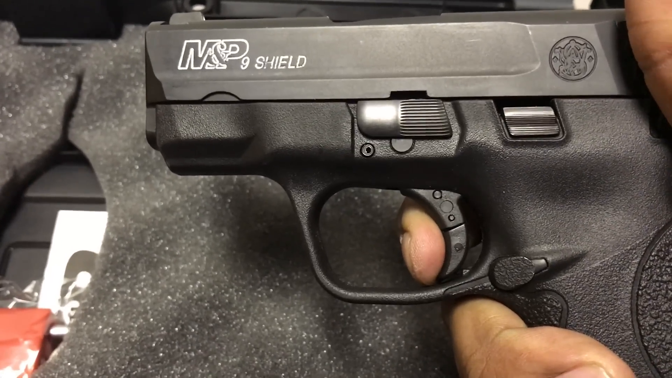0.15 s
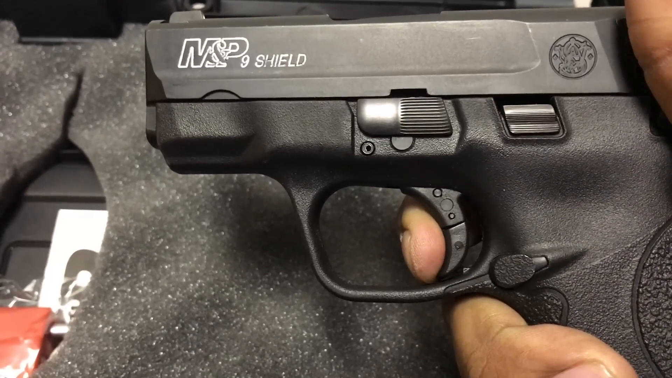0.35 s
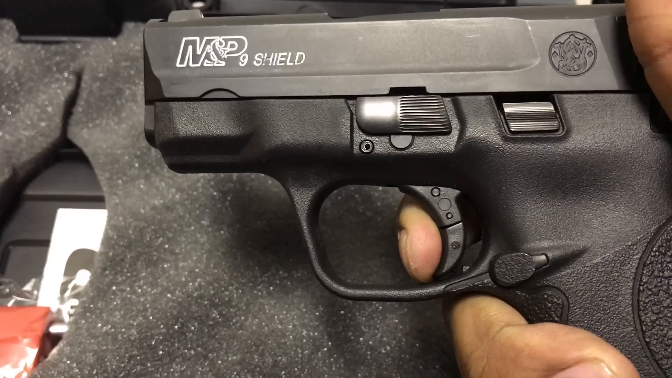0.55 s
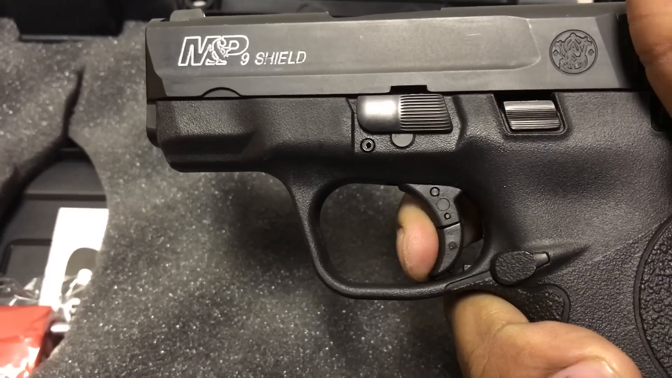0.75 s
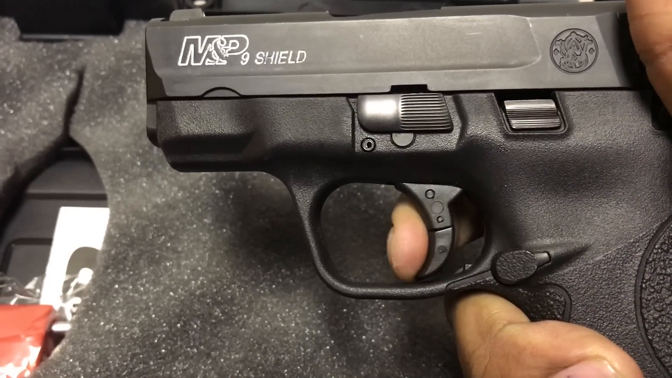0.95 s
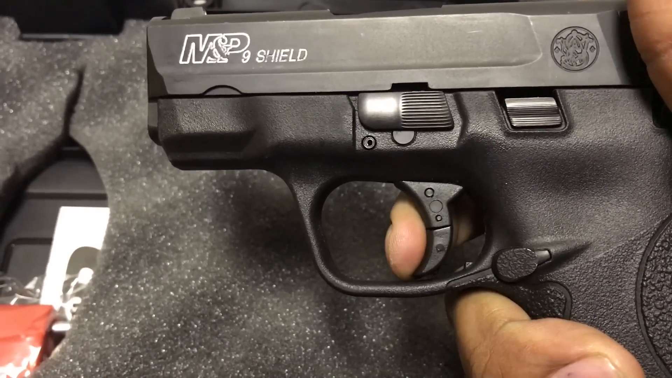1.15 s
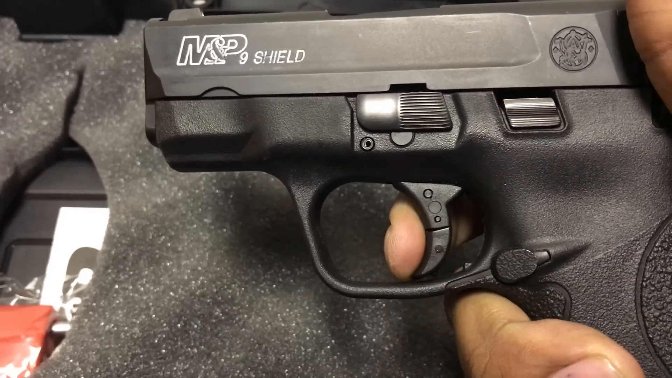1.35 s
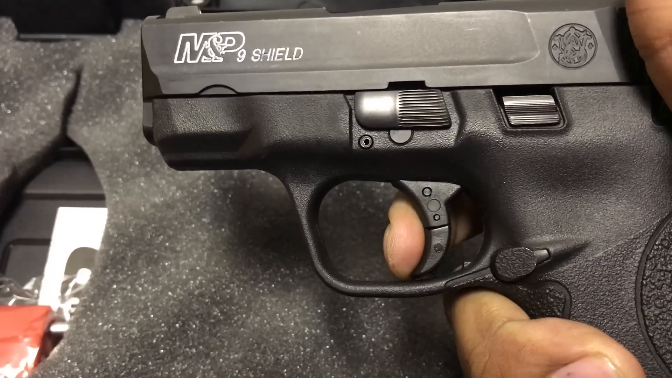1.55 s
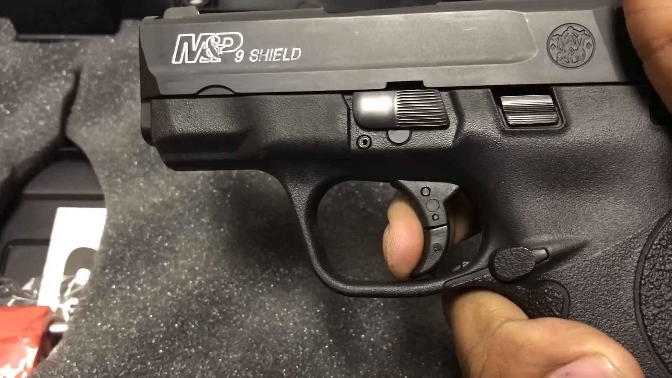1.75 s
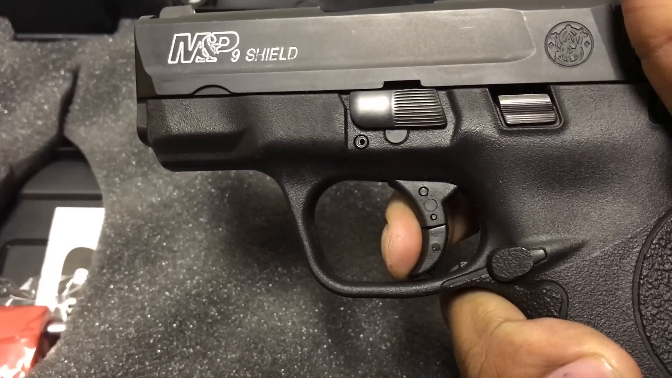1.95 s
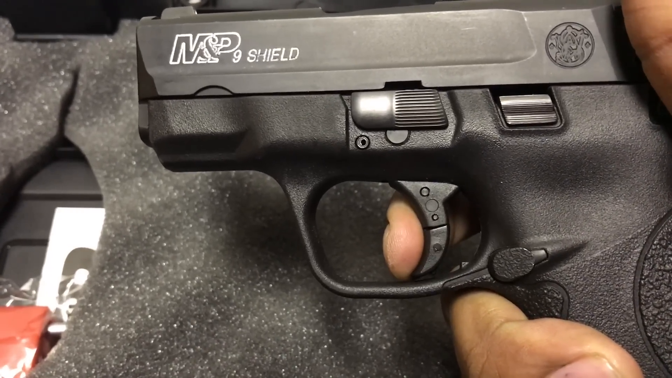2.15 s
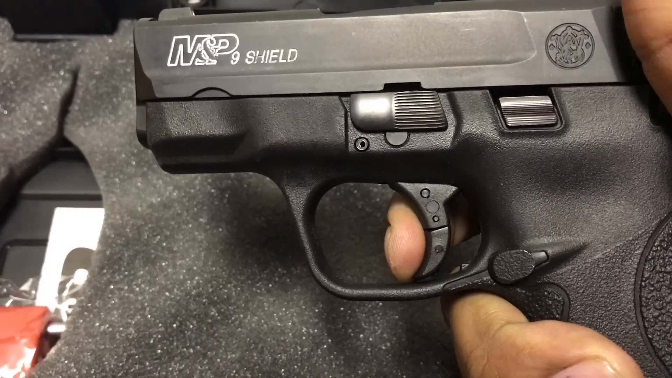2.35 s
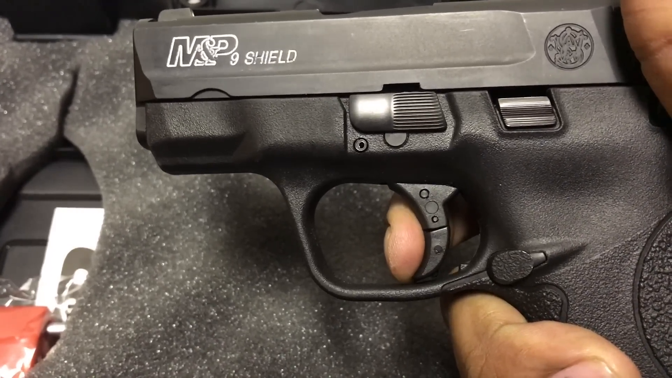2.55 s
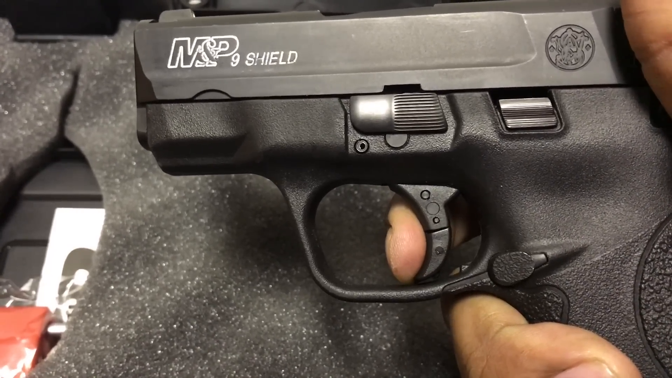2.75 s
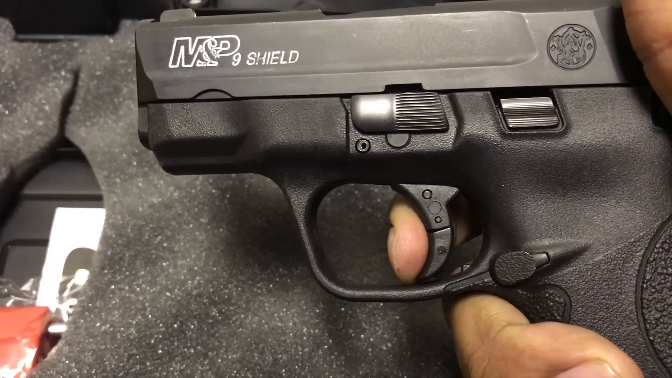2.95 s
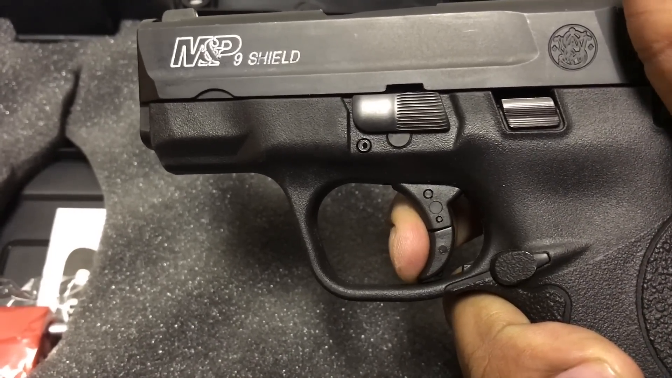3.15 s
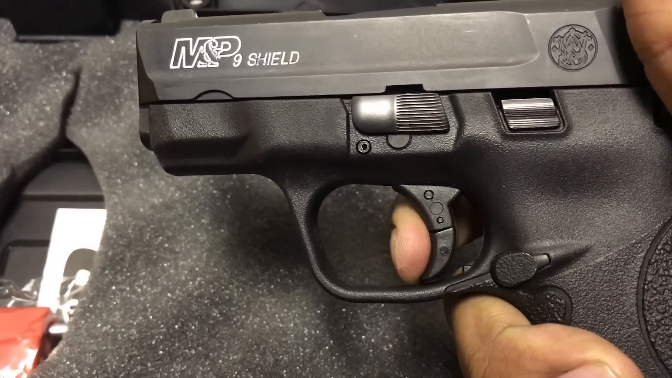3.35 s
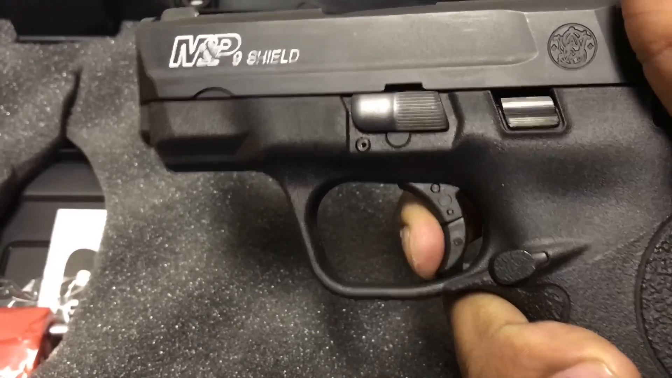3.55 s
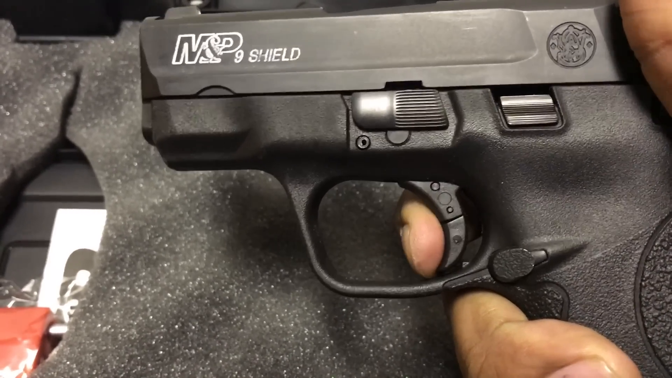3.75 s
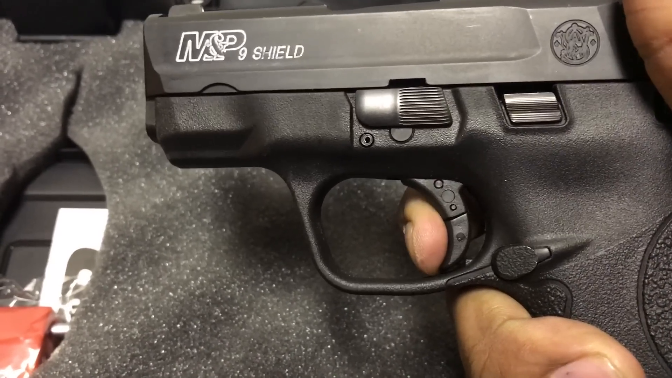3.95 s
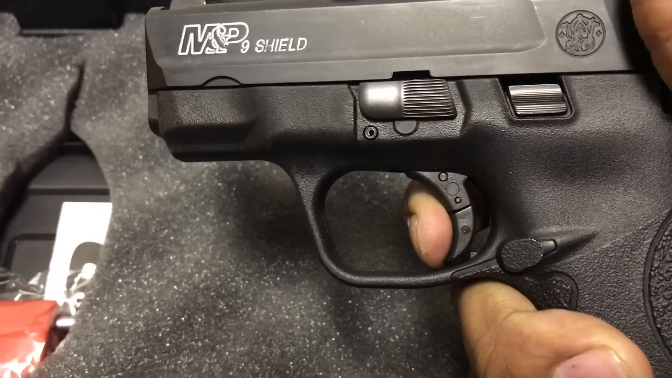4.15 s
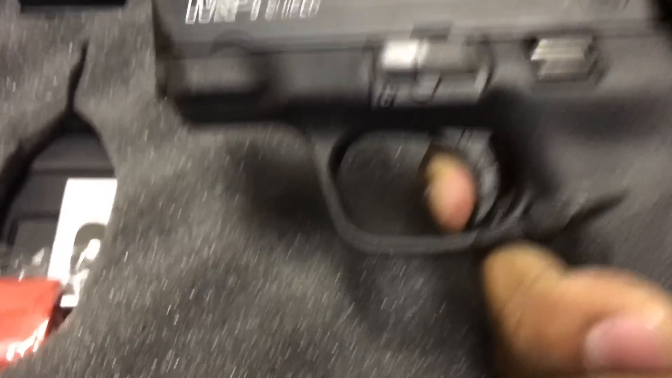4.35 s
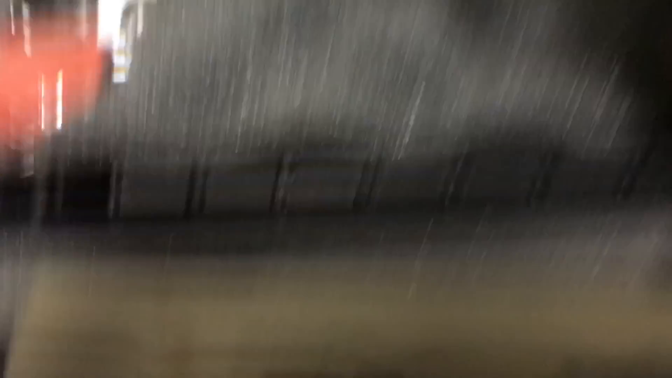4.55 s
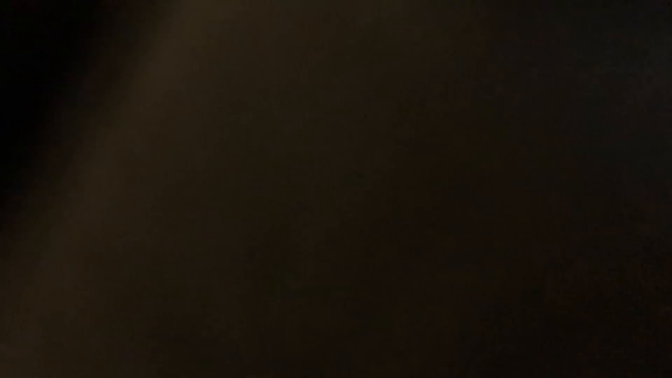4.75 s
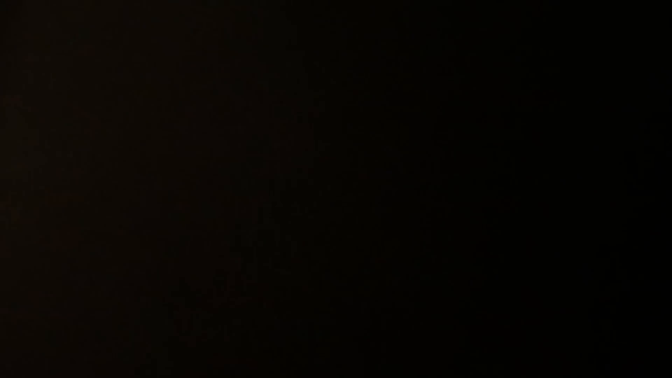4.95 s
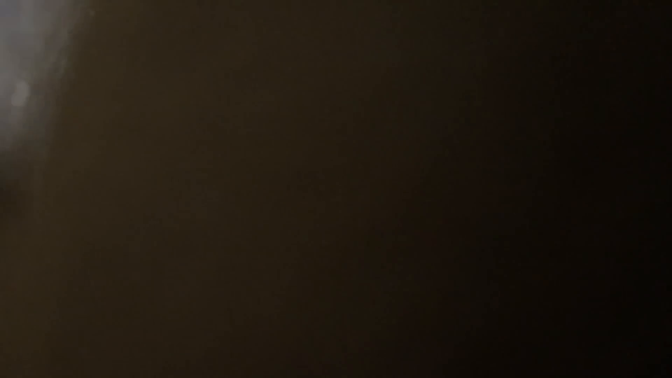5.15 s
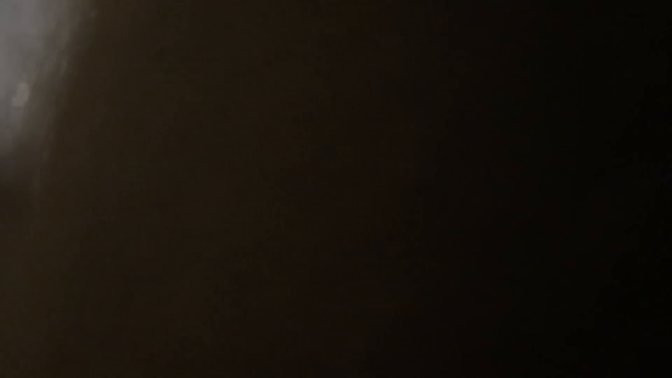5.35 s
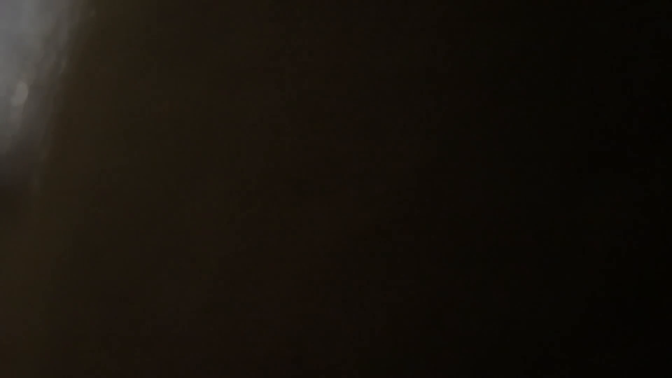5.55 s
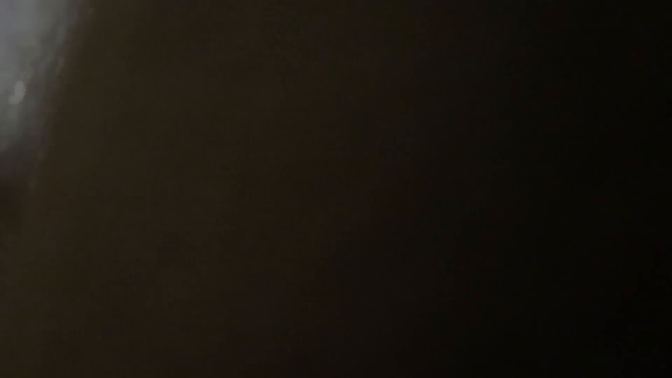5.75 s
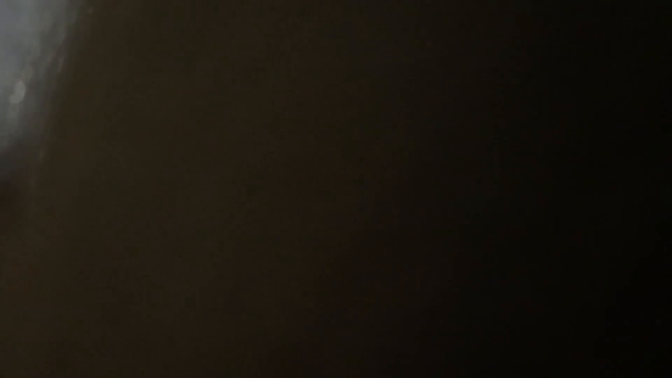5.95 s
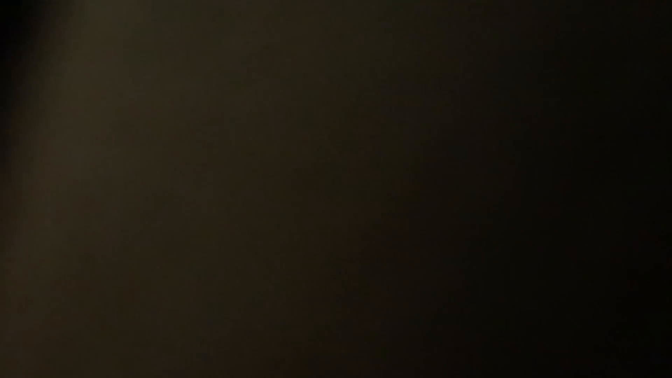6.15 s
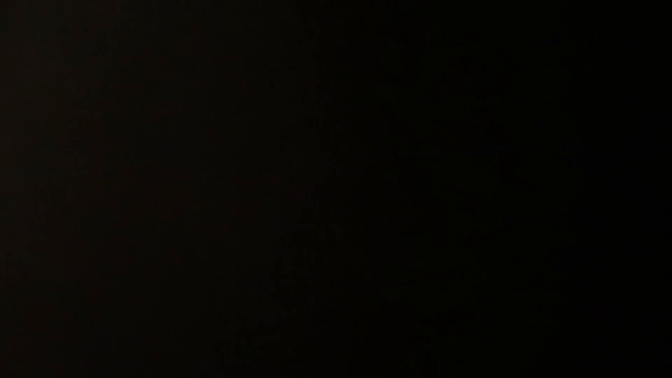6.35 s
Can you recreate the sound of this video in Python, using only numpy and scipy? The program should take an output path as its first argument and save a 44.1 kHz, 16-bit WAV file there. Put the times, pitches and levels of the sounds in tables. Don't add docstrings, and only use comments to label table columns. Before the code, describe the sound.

Dry trigger click over faint hum, a sharp metallic reset, then bumping, scraping phone handling and a loud two-stroke rack of a pistol slide.

```python
import sys
import numpy as np
from scipy import signal
from scipy.fft import rfft, irfft, next_fast_len
from scipy.io import wavfile
from scipy.ndimage import uniform_filter1d, map_coordinates

SR = 44100
rng = np.random.default_rng(int(sys.argv[2]) if len(sys.argv) > 2 else 0)


def dump(signal):
    limited = np.clip(np.atleast_2d(signal).T, -1, 1)
    pcm = np.round(limited * 32767).astype(np.int16)
    wavfile.write(sys.argv[1], SR, pcm)


def convert_level_to_amplitude(level_db):
    exponent = np.asarray(level_db, float) / 20
    return 10 ** exponent


N = 281996
T = np.arange(N) / SR

# [f/Hz, density/dB]
AIR = [(15, -30.5), (30, -7.5), (52, 1.5), (90, -6.5), (220, -12.5), (485, -20.5), (1500, -28.5),
       (16000, -37.5)]
AIR_DB = -72
# [f/Hz, rms level/dB]
HUM = [(119.95, -59), (239.95, -75)]
# [from t/s, to t/s, f/Hz]
WHINE = [
    (0, .75, 954.5),
    (.8, 1.19, 955.2),
    (1.62, 2.0, 954.1),
    (2.27, 2.93, 965.2),
    (2.95, 3.3, 964.2),
    (3.42, 3.63, 958.2),
    (4.1, 4.8, 956.8),
]
# [f/Hz, rms level/dB]
COMB = [(6500, -102), (8600, -89.5), (10500, -94.5), (12500, -86.5), (15500, -93.5)]
# [from t/s, to t/s, f/Hz, level/dB]
LENS_STEPS = [
    (2.148, 2.226, 11130, -80),
    (2.143, 2.17, 11600, -91),
    (3.338, 3.357, 11010, -78.5),
]
# [t/s, change/dB]
DUCKS = [
    (3.65, -12),
    (5.12, -5),
    (6.05, 0.5),
]
DUCK_IN_S, DUCK_HOLD_S, DUCK_OUT_S = 0.16, 0.042, 0.16
# [from t/s, to t/s, hiss level/dB]
OPEN = [
    (1.195, 1.61, -62),
    (3.643, 4.097, -64.5),
    (4.82, 5.519, -62),
    (5.65, 6.399, -62),
]
# [f/Hz, density/dB]
OPEN_HISS = [(120, -34.5), (200, -6.5), (236, -5.5), (851, -12), (10500, -19.5), (13100, -20), (16000, -22)]
# [f/Hz, t60/s]
ROOM_T60 = [(300, .15), (1500, .27), (4000, .25), (12000, .21)]
# [f/Hz, level/dB]
SPLASH = [(500, -40), (1500, -3), (4500, 0), (16000, -16)]

# [t/s, peak level/dB, knock/dB, bright edge/dB]
LAYING = [(4.8137, -43.5, -10.5, 2), (4.8255, -51, -7, 0), (4.8351, -29.5, -2, -3), (4.837, -10, -4.5, 7.5),
          (4.8402, -26, 7.5, -1.5), (4.844, -17, -4.5, 7), (4.8604, -51, -11, 0), (4.8652, -43, 4, -16),
          (4.886, -19, 1, -19), (5.0365, -43, -8.5, -16), (5.052, -23, -15, -17), (5.0569, -34, -14, -15.5),
          (5.082, -35, 5, -10), (5.0898, -41, 9, -11.5), (5.0985, -35, 2.5, -11), (5.1077, -12.5, 8, -19),
          (5.1094, -1, -12.5, -5.5), (5.1208, -32, 4, -14), (5.1302, -39, 8.5, -22), (5.133, -34, 6, -14.5),
          (5.141, -42, 4, -12), (6.345, -40, -2, -13), (6.3472, -40.5, 0, -13.5),
          (6.3545, -33.5, -17.5, -10), (6.373, -36, -5.5, -17.5), (6.38, -38.5, -5, -8),
          (6.3879, -31.5, -15, -17)]
# [f/Hz, width/Hz, level/dB]
LAYING_BODY = [(1110, 880, -2), (1730, 1040, -8), (3320, 1000, -1.5), (4380, 910, 3), (6770, 590, 3),
               (8000, 1700, 0), (11600, 1500, -1), (14500, 2300, -3.5)]
TICK_T60_S = 0.0042
# [t/s, peak level/dB, knock/dB, bright edge/dB, t60/s]
SCUFFS = [
    (.177, -52.5, -10, -3.5, 0.14),
    (.21, -62, 3, -16, 0.23),
    (4.382, -75, 23, -6, 0.1),
    (5.345, -54, 2.5, -14.5, 0.062),
    (5.465, -56.5, 4, -1, 0.11),
    (5.57, -61.5, 17, -14, 0.31),
    (5.615, -61.5, 1, -6, 0.038),
    (6.179, -65, 17, -5.5, 0.044),
    (.76, -77.5, 14, 0, 0.44),
]
# [f/Hz, width/Hz, level/dB]
SCUFF_BODY = [(600, 130, 3), (1220, 140, 0), (1750, 240, -8.5), (2700, 550, -4), (4280, 660, -5),
              (5300, 250, 0.5), (8520, 920, 0)]
# [t/s, level/dB]
OPENING_TONES = [
    (0.1748, -61.5),
    (.187, -62),
    (0.213, -69),
]
# [f/Hz, level/dB, swell/s]
OPENING_MODES = [(1166, -2.5, .003), (1746, -1, 0.0028), (2150, 0, 0.0025), (3513, -7, .003),
                 (4430, -8.5, 0.0028), (5510, 1, 0.00163), (8960, -8, .003)]
# [f/Hz, level/dB, swell/s]
CLASP_MODES = [
    (8200, 0.0015, .003),
]
CLASP_S, CLASP_DB = 5.108, -45
# [t/s, peak level/dB, f/Hz]
KNOCKS = [(0.177, -40.5, 190), (0.192, -37.5, 202), (0.203, -38, 207), (0.238, -47.5, 201),
          (0.214, -38, 104), (1.227, -48.5, 79), (3.6541, -25, 321), (3.652, -22.5, 150),
          (3.657, -18.5, 57.7), (4.385, -46.5, 117.8), (4.813, -40, 300), (4.825, -31, 450.2),
          (4.836, -8, 528), (4.843, -7.5, 407), (4.859, -21.5, 220), (4.874, -23, 250), (4.886, -15, 620),
          (4.888, -12, 208.5), (5.107, -10.5, 564), (5.1113, -5.5, 341.3), (5.156, -30, 85),
          (5.116, -20.5, 713), (5.12, -22.5, 790.6), (5.13, -16, 300), (5.134, -10.5, 287),
          (5.141, -14.5, 327), (5.152, -21.5, 202), (5.576, -45, 113), (5.676, -33.5, 70.9),
          (5.696, -27.5, 49.7), (5.925, -34, 260), (5.978, -27, 108), (6.348, -35, 627),
          (6.355, -35.5, 600), (6.3716, -19.5, 568), (6.377, -21, 667), (6.386, -15.5, 520)]
KNOCK_T60_S, KNOCK_CYCLES = 0.028, 2
# [t/s, peak level/dB, f/Hz, t60/s]
THUDS = [
    (4.838, -8.5, 147.6, 0.045),
    (5.107, -10.5, 76.45, 0.075),
    (6.369, -26, 175, 0.036),
         (3.643, -39, 320, .03),
    (5.109, -12.5, 110, .03),
    (5.108, -20, 42, .16),
    (5.68, -37.5, 38, .16),
    (5.92, -37, 42, .16),
    (6.36, -36, 45, .12),
]
# [t/s, peak level/dB, f/Hz]
CATCHES = [(4.924, -27, 300), (4.932, -25, 330), (4.937, -18, 230), (4.943, -22, 450), (4.95, -22.5, 330),
           (4.959, -30.5, 754), (4.968, -16.5, 220), (4.976, -18.5, 394.2), (4.982, -30, 330),
           (4.997, -28, 560), (5.052, -30, 238.5), (5.083, -29.5, 805), (5.086, -27.5, 252),
           (5.122, -26, 450), (5.146, -26, 500), (5.16, -40, 332)]
# [t/s, peak level/dB, f/Hz]
HOLLOW = [(3.65, -30, 656), (3.659, -32, 799), (3.667, -36.5, 600), (3.682, -39.5, 800), (3.694, -44, 753),
          (4.838, -16.5, 240), (4.939, -25, 238), (5.11, -12, 228), (5.112, -14.5, 563), (5.93, -40, 352),
          (5.988, -36.5, 300), (2.92, -60, 1100), (3.481, -60, 1050), (6.18, -54.5, 819.7)]
# [f/Hz, density/dB]
SHELL = [(150, -28.5), (400, 0), (900, 0.5), (1500, -8.5), (2500, -35), (5000, -63)]
# [t/s, pressure/dB]
DRAG = [
    (4.9, -32.5),
    (4.916, -35.5),
    (4.942, -26.5),
    (4.956, -30),
    (4.974, -28),
    (5.016, -39),
    (5.095, -36.5),
]
DRAG_HZ, DRAG_SPREAD, DRAG_CREST_DB, DRAG_T60_S, DRAG_GRIT_DB = 300, 0.43, -3.5, 0.035, -22
# [t/s, pressure/dB]
SETTLE = [
    (5.144, -27),
    (5.187, -50),
    (5.231, -58),
    (5.25, -66.5),
]
# [t/s, pressure/dB]
HOLD = [
    (5.3, -70.5),
    (5.6, -56.5),
    (5.85, -56.5),
]
# [f/Hz, density/dB]
RUB = [(60, -20), (130, -2.5), (240, 3.5), (420, -2.5), (900, -12.5), (1600, -29), (4000, -59.5)]
RUB_OVER_PRESSURE_DB = -2.5
# [t/s, level/dB]
SCRAPE = [
    [(4.38, -78), (4.79, -78)],
    [(5.105, -46.5), (5.2, -71)],
    [(5.62, -69), (5.69, -33), (5.74, -38), (5.8, -63.5)],
    [(5.83, -53), (5.895, -41.5), (5.908, -26), (5.935, -26.5), (5.96, -45.5), (6.0, -37)],
    [(6.342, -56), (6.39, -37)],
]
# [f/Hz, density/dB]
GRIT = [(410, -16), (700, -11), (1020, -11), (1250, -4.5), (4610, -4.5), (14600, -31), (16000, -43)]
# [from t/s, to t/s, level/dB]
RUSTLE = [
    (4.968, 4.997, -49),
    (5.007, 5.08, -60),
    (5.076, 5.118, -49.5),
]

# [t/s, peak level/dB, knock/dB, bright edge/dB, t60/s]
CREAKS = [(0.5874, -66, 8.5, -1.5, 0.029), (0.6384, -80, 18.5, 0, 0.019), (0.9845, -67, 13, -5, 0.017),
          (1.0014, -75, 17, -5, 0.026), (1.0262, -63, 27, 3, 0.013), (1.0345, -49.5, -3, 2.5, 0.017),
          (1.0705, -62, 13.5, -7, 0.012), (1.9649, -67, 8.5, -7, 0.0025), (2.7884, -83.5, 21.5, 0, 0.00877),
          (2.9204, -74.5, 1, 9, 0.0091), (3.3994, -72, 7, 7, 0.011), (3.4814, -66.5, 4.5, -5.5, 0.0093)]
# [f/Hz, width/Hz, level/dB]
CREAK_BODY = [(1450, 550, 0), (3500, 700, 0), (4700, 1000, -6), (6200, 1500, -18), (8400, 1500, -3),
              (10200, 1500, -2), (13300, 1200, 0)]
# [f/Hz, level/dB, swell/s]
SEAR_MODES = [(1315, 3.5, 0.0027), (1606, -1.5, .0016), (1950, -6, 0.00083), (2465, -11, 0.00066),
              (2760, -11, .001), (3554, 5.5, 0.0011), (3750, -2, .0005), (4400, -2, 0.00077),
              (5130, -3, .0006), (6700, -10, .0004), (8410, -15, .0003), (10000, -10.5, .0004),
              (11570, -13, 0.00044), (12880, -7.5, .0005)]
SEAR_S, SEAR_DB = 1.0298, -35.5
# [t/s, peak level/dB, knock/dB, bright edge/dB, t60/s]
TRIGGER = [
    (1.1794, -54.5, 1.5, -2.5, 0.0079),
    (1.1909, -59, 7.5, -5, 0.005),
    (1.1964, -49, 0, -12, 0.015),
    (1.199, -24, -10, -12, 0.0041),
    (1.2008, -11, -9, -3.5, 0.009),
    (1.2167, -35, -5, -10.5, 0.0056),
]
# [f/Hz, width/Hz, level/dB]
TRIGGER_BODY = [(1380, 990, 0), (1890, 400, 0), (2750, 500, -6), (4800, 900, 0), (6660, 900, -2.5),
                (7540, 340, 0.5), (9700, 310, -10.5), (11390, 800, -8.5), (14300, 900, -5),
                (15100, 900, -6)]
# [f/Hz, level/dB, swell/s]
STRIKER_MODES = [(1358, -2.5, 0.00092), (1670, 0, 0.00091), (1901, -4, 0.0009), (3090, -2.5, 0.00047),
                 (3850, -7, .0007), (4100, -6.5, 0.00065), (5680, -1.5, 0.00058), (6250, -6, 0.00079),
                 (6920, -12, 0.00079), (8630, -8, 0.0006), (10264, -12.5, 0.00048), (12900, -12.5, 0.00057),
                 (14100, -14.5, .0004), (15300, -17, .0004)]
STRIKER_S, STRIKER_DB = 1.2004, -10.5
# [f/Hz, level/dB, t60/s]
FRAME = [(1220, -5, 0.14), (1370, 0, 0.1), (1644, 0.5, 0.12), (1956, -6, 0.09)]
# [t/s, peak level/dB, knock/dB, bright edge/dB]
RESET = [
    (3.6292, -31.5, -15, 12),
    (3.6351, -41.5, -21, 6.5),
    (3.6404, -33, -18, 8.5),
    (3.6458, -40, -9.5, -6.5),
    (3.6497, -6.5, -11.5, 2.5),
    (3.679, -53, 14, -7.5),
    (3.6882, -32.5, 3, -5),
]
# [f/Hz, width/Hz, level/dB]
RESET_BODY = [(1235, 200, 0), (1620, 250, 2), (2000, 300, 0), (3150, 900, 1), (4000, 1200, -1),
              (5400, 500, 0), (6500, 800, -2), (9300, 1500, -2), (10800, 1500, 2), (13000, 1500, -5),
              (15200, 1000, 2)]
RESET_T60_S = .007, .011
CHATTER_S, CHATTER_GAP_S = 3.6526, .00228
CHATTER_DB, CHATTER_FADE_DB, CHATTER_KNOCK_DB, CHATTER_EDGE_DB = -11.5, 0.11, -8.5, 6
CHATTER_SWING_DB = 4
# [from t/s, to t/s, f/Hz, final level/dB]
SPRING = (3.633, 3.651, 3050, -31)
# [t/s, peak level/dB, bright edge/dB]
PULL = [(5.6368, -24, -18.5), (5.6575, -35.5, -10), (5.6686, -12.5, -10.5), (5.6722, -17.5, -8),
        (5.676, -6.5, -14.5), (5.6818, -3, -8), (5.685, -3.5, 0), (5.6866, -0.5, -8), (5.6922, 0.5, -4.5),
        (5.7018, -14.5, -2), (5.7074, -1, -4), (5.7172, -5.5, -8), (5.725, -20, -14.5),
        (5.7575, -12.5, -13), (5.7645, -13.5, -20)]
# [t/s, peak level/dB, bright edge/dB]
RETURN = [(5.842, -26, -7), (5.8512, -20.5, -11), (5.876, -35.5, -15), (5.888, -24, -8.5),
          (5.8925, -20.5, -15), (5.897, -16, -6.5), (5.9055, -17, -0.5), (5.909, -6, -5),
          (5.9140, -1.5, -17), (5.919, -6.5, -2), (5.9233, -6.5, -2), (5.9267, -2.5, -0.5),
          (5.9326, -1.5, -6), (5.9493, -13, -9.5), (5.9532, -21.5, -11.5), (5.971, -8, -17),
          (5.975, -0.5, -14.5), (5.9836, -20, -14)]
# [f/Hz, width/Hz, level/dB]
RACK_BODY = [(1300, 600, -2), (2000, 700, 0), (2600, 800, -5), (3800, 800, 0), (4400, 600, -4),
             (5150, 500, -3), (6500, 900, -18), (8100, 900, -1), (11000, 2500, -4), (15000, 1500, -3)]
# soft, hard [t60/s]
RACK_T60_S = (.01, .013)
HARD_DB = -7.5
RACK_KNOCK_DB, KNOCK_SLOPE = -14, 0.22
# [f/Hz, level/dB, t60/s]
STEEL = [(3670, -12, 0.07), (7220, -9, .09), (10750, -2, .09), (11090, -1, 0.12)]
# [t/s, f/Hz, level/dB, swell/s]
PINGS = [(5.6362, 4100, -37, .0008), (5.638, 1990, -39, .0015), (5.676, 3800, -10, .0005),
         (5.682, 5810, -9, .0006), (5.6855, 4310, -10, .001), (5.6875, 10800, -19.5, .0015),
         (5.6925, 3670, -11, .0007), (5.701, 11000, -23, .0015), (5.7078, 3780, -13.5, .0008),
         (5.7085, 5070, -16.5, .0007), (5.7177, 5300, -13.5, .001), (5.718, 7400, -14.5, .0005),
         (5.7583, 4000, -18.5, .0007), (5.909, 3770, -12.5, .0006), (5.9138, 2885, -9.5, .0006),
         (5.92, 11120, -27, .0015), (5.924, 4300, -13, .0007), (5.9265, 11090, -17.5, .0025),
         (5.9274, 8200, -14.5, .0008), (5.9495, 4300, -18, .001), (5.971, 3860, -21, .0006),
         (5.975, 3688, -9.5, .0007), (5.976, 7240, -17, .0006), (5.978, 11090, -50.5, 0.0085),
         (5.683, 2010, -18.5, 0.00086), (5.693, 2090, -16.5, 0.0011), (5.9095, 2290, -15, 0.00073),
         (5.92, 2200, -17.5, .001), (5.9275, 2100, -18.5, .001), (5.933, 2320, -15, .0008),
         (5.9755, 2200, -16, 0.0006)]


def unit(x):
    return x / np.sqrt(np.mean(x ** 2) + 1e-20)


def along(points, hz):
    f, v = np.transpose(points)
    return np.interp(np.log(hz + 1), np.log(f + 1), v)


def filtered(x, response):
    m = next_fast_len(N + SR // 2)
    return irfft(rfft(x, m) * response(np.fft.rfftfreq(m, 1 / SR)), m)[:N]


def hiss(spectrum):
    return filtered(rng.standard_normal(N), lambda hz: convert_level_to_amplitude(along(spectrum, hz)))


def gate(t0, t1, edge_s=0.004):
    return np.clip(np.minimum(T - t0, t1 - T) / edge_s + .5, 0, 1)


def pressure(spans):
    return sum(convert_level_to_amplitude(np.interp(T, *np.transpose(rows))) * gate(rows[0][0], rows[-1][0]) for rows in spans)


def contacts(rows, body, rise_s, edge_share, scatter, order=1):
    t, f = np.arange(4096) / SR, np.fft.rfftfreq(4096, 1 / SR)
    out = np.zeros(N + 4096)
    small = (1j * f / (700 + 1j * f)) ** 4
    centre, width, level = np.transpose(body)[:, :, None]
    w = np.maximum(width, 300)
    zone = np.digitize(centre[:, 0], (2200, 7000))
    power = np.where(zone == 0, order, 1)[:, None]
    sign = (-1.) ** np.arange(len(body))[:, None]
    for s, db, knock_db, edge_db, t60 in rows:
        shift = scatter * rng.standard_normal((2, len(body), 1))
        c = centre * (1 + .05 * shift[0])
        resonance = (1j * f * w / (c * c - f * f + 1j * f * w)) ** power
        modes = small * sign * convert_level_to_amplitude(level + 4 * shift[1]) * resonance
        lasting = t60 * np.array([[1], [1], [edge_share]])
        chatter = rng.standard_normal((3, len(t))) * convert_level_to_amplitude(-60 * t / lasting) * (1 - np.exp(-t / rise_s))
        parts = irfft(rfft(chatter) * [modes[zone == k].sum(axis=0) for k in range(3)])[:, :3600]
        parts *= convert_level_to_amplitude([[db + knock_db], [db], [db + edge_db]]) / abs(parts).max(axis=1, keepdims=True)
        out[round(s * SR):][:3600] += parts.sum(axis=0)
    return out[:N]


def blow(s, db, modes):
    t, out = np.arange(4000) / SR, np.zeros(N)
    ring = 0
    for hz, level, swell in modes:
        envelope = (t / swell / 2) ** 2 * np.exp(2 - t / swell)
        ring = ring + convert_level_to_amplitude(db + level) * envelope * np.sin(2 * np.pi * hz * t)
    out[round(s * SR):][:len(t)] = ring
    return out


def ringing(blows, modes, ring_db):
    t = np.arange(SR // 4) / SR
    index = np.arange(len(modes))[:, None]
    flutter = map_coordinates(rng.standard_normal((len(modes), 60)), np.broadcast_arrays(index, t * 150))
    ring = sum(convert_level_to_amplitude(db - 60 * t / t60) * np.sin(2 * np.pi * hz * t + .8 * sway)
               for (hz, db, t60), sway in zip(modes, flutter))
    return blows + convert_level_to_amplitude(ring_db) * signal.fftconvolve(blows, ring)[:N]


def room(x, wet_db):
    hz, t, z = signal.stft(rng.standard_normal(SR // 2), SR, nperseg=128)
    decay = convert_level_to_amplitude(-60 * t / along(ROOM_T60, hz)[:, None]) + convert_level_to_amplitude(11.0 - 60 * t / 0.017)
    tail = signal.istft(z * decay, SR, nperseg=128)[1]
    splash = filtered(x * rng.standard_normal(N), lambda hz: convert_level_to_amplitude(along(SPLASH, hz)))
    sent = np.pad(x + splash, (130, 0))
    return x + convert_level_to_amplitude(wet_db + 2.5) * signal.fftconvolve(sent, tail / np.linalg.norm(tail))[:N]


def room_air():
    air = hiss(AIR)
    return air * convert_level_to_amplitude(AIR_DB) / np.std(filtered(air, lambda hz: hz > 300))


def mains_hum(sway):
    return sum(np.sqrt(2) * convert_level_to_amplitude(db + 0.43 * sway) * np.sin(2 * np.pi * hz * T + .1 * sway) for hz, db in HUM)


def lens_motor(sway):
    out = np.zeros(N)
    for t0, t1, hz in WHINE:
        for k in range(7, 17):
            level_db = along(COMB, k * hz) + 3 + 1.2 * np.roll(sway, 9000 * k)
            out += gate(t0, t1) * convert_level_to_amplitude(level_db) * np.sin(2 * np.pi * k * hz * T + k * k)
    for t0, t1, hz, db in LENS_STEPS:
        out += convert_level_to_amplitude(db + 10.5) * gate(t0, t1) * np.sin(2 * np.pi * hz * T)
    return out


def background():
    sway = map_coordinates(rng.standard_normal(80), [T * 9])
    return room_air() + mains_hum(sway) + lens_motor(sway)


def ducking():
    corners_s = np.cumsum([0, DUCK_IN_S, DUCK_HOLD_S, DUCK_OUT_S])
    return convert_level_to_amplitude(sum(np.interp(T - s, corners_s, [0, db, db, 0]) for s, db in DUCKS))


def freed_hiss():
    return sum(convert_level_to_amplitude(db) * gate(t0, t1) for t0, t1, db in OPEN) * unit(hiss(OPEN_HISS))


def sliding():
    level = pressure(SCRAPE + [np.add(DRAG, (0, DRAG_GRIT_DB))])
    level = level + sum(convert_level_to_amplitude(db) * gate(t0, t1) for t0, t1, db in RUSTLE)
    unevenness = unit(uniform_filter1d(rng.standard_normal(N), size=60))
    grains = rng.standard_normal(N) * convert_level_to_amplitude(3.5 * unevenness)
    scrape = level * unit(filtered(grains, lambda hz: convert_level_to_amplitude(along(GRIT, hz))))
    rub = convert_level_to_amplitude(RUB_OVER_PRESSURE_DB) * pressure([DRAG, SETTLE, HOLD]) * unit(hiss(RUB))
    return scrape + rub


def drag_knocks(count=20):
    s, db = np.transpose(DRAG)
    luck = rng.standard_normal((count, 3))
    when = s[0] + (s[-1] - s[0]) * (np.arange(count) + .5 + 0.527 * luck[:, 0]) / count
    return [(w, np.interp(w, s, db) + DRAG_CREST_DB + 2 * a, DRAG_HZ * np.exp(DRAG_SPREAD * b), DRAG_T60_S)
            for w, (_, a, b) in zip(when, luck)]


def shell_knocks():
    rows = [(*row, KNOCK_T60_S + KNOCK_CYCLES / row[2]) for row in KNOCKS]
    rows += drag_knocks() + THUDS
    rows += [(*row, DRAG_T60_S) for row in CATCHES + HOLLOW]
    knocks, force, t = np.zeros(N + 6000), np.zeros(N + 6000), np.arange(6000) / SR
    for s, db, hz, t60 in rows:
        swing = sum(share * np.sin(2 * np.pi * hz * ratio * t + rng.uniform(0, 2 * np.pi))
                    for ratio, share in ((.6, 0.22), (1, 0.88), (1.9, 0.24)))
        push = convert_level_to_amplitude(db + 1.5 - 60 * t / t60) * (1 - np.exp(-(t * hz / 0.25) ** 2))
        knocks[round(s * SR):][:len(t)] += push.max() * push * swing / abs(push * swing).max()
        force[round(s * SR):][:len(t)] += push * min(1, hz / 250)
    rattle = convert_level_to_amplitude(-19.0) * force[:N] * unit(hiss(SHELL))
    return rattle + filtered(knocks[:N], lambda hz: (1j * hz / (40 + 1j * hz)) ** 2)


def ticks_and_scuffs():
    rows = [(*row, TICK_T60_S) for row in LAYING]
    ticks = convert_level_to_amplitude(-1.5) * contacts(rows, LAYING_BODY, rise_s=.00015, edge_share=.9, scatter=0.5)
    scuffs = contacts(SCUFFS, SCUFF_BODY, rise_s=0.000755, edge_share=0.93, scatter=0.11)
    tones = sum(blow(s, db, OPENING_MODES) for s, db in OPENING_TONES)
    clasp = blow(CLASP_S, CLASP_DB, CLASP_MODES)
    return room(ticks + scuffs + tones + clasp, wet_db=-37.5)


def trigger_creaks():
    creaks = convert_level_to_amplitude(2.5) * contacts(CREAKS, CREAK_BODY, rise_s=0.0026, edge_share=0.93, scatter=0.31, order=2)
    creaks = creaks + blow(SEAR_S, SEAR_DB, SEAR_MODES)
    return room(ringing(creaks, FRAME[1:2], ring_db=-58), wet_db=-20.5)


def striker_fall():
    striker = convert_level_to_amplitude(-0.5) * contacts(TRIGGER, TRIGGER_BODY, rise_s=0.00017, edge_share=1.0, scatter=0.082)
    striker = striker + blow(STRIKER_S, STRIKER_DB, STRIKER_MODES)
    return room(ringing(striker, FRAME, ring_db=-65.0), wet_db=-21.0)


def reset_contacts():
    chatter = []
    for k in range(8):
        db = CHATTER_DB - k * k * CHATTER_FADE_DB + CHATTER_SWING_DB * (-1) ** k
        chatter.append((CHATTER_S + k * CHATTER_GAP_S, db, CHATTER_KNOCK_DB, CHATTER_EDGE_DB))
    blow_s = RESET[4][0]
    return [(*row, RESET_T60_S[int(row[0] >= blow_s)]) for row in RESET + chatter]


def slide_reset():
    reset = convert_level_to_amplitude(1.0) * contacts(reset_contacts(), RESET_BODY, rise_s=.0001, edge_share=0.4, scatter=.4)
    t0, t1, hz, db = SPRING
    spring = convert_level_to_amplitude(db - 700 * np.clip(t1 - T, 0, 1)) * gate(t0, t1) * np.sin(2 * np.pi * hz * T)
    return room(ringing(reset, FRAME, ring_db=-47.0) + spring, wet_db=-16.0)


def rack_stroke(rows):
    hits = [(s, db, RACK_KNOCK_DB - KNOCK_SLOPE * db, edge_db, RACK_T60_S[int(db > HARD_DB)])
            for s, db, edge_db in rows]
    return convert_level_to_amplitude(-3) * contacts(hits, RACK_BODY, rise_s=.00015, edge_share=.9, scatter=.4, order=2)


def slide_racking():
    back = ringing(rack_stroke(PULL), STEEL[:3], ring_db=-38.5)
    forth = ringing(rack_stroke(RETURN), STEEL[:2] + STEEL[3:], ring_db=-38.5)
    pings = sum(blow(s, db, [(hz, 0, swell)]) for s, hz, db, swell in PINGS)
    return room(back + forth + pings, wet_db=-18.0)


def scene():
    phone = ducking() * background() + freed_hiss()
    handling = sliding() + shell_knocks() + ticks_and_scuffs()
    pistol = trigger_creaks() + striker_fall() + slide_reset() + slide_racking()
    return (phone + handling + pistol)[None]


def low_pass(x):
    return signal.sosfilt(signal.butter(12, 16990, fs=SR, output="sos"), x)


def record(dry):
    soft = dry[0] / (1 + abs(dry[0]) ** 5) ** (1 / 5)
    edge_hz, edge_db = [15300, 15700, 16000, 16500, 17000], [0, -4, -34, -38, -70]
    cut = filtered(soft, lambda hz: convert_level_to_amplitude(np.interp(hz, edge_hz, edge_db)))
    return low_pass(cut[None])


dry = scene()
out = record(dry)
dump(out)
```